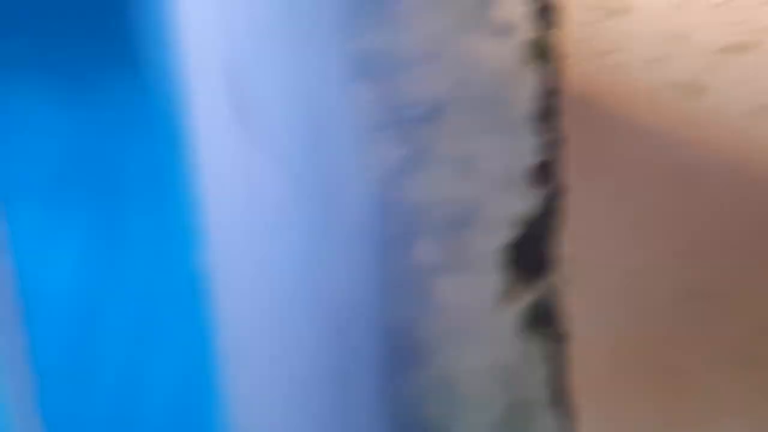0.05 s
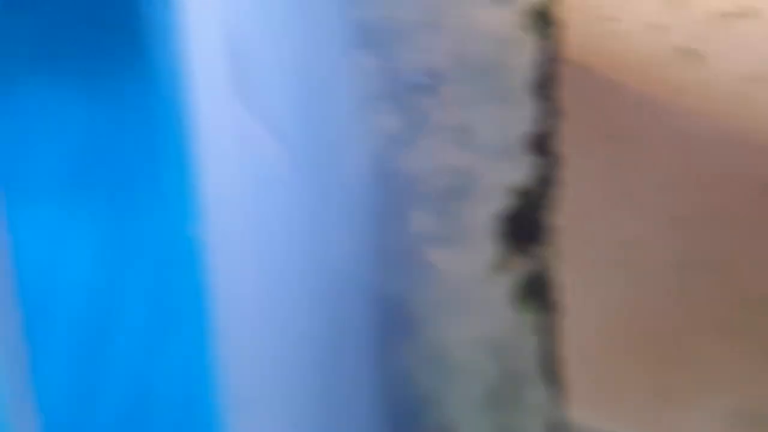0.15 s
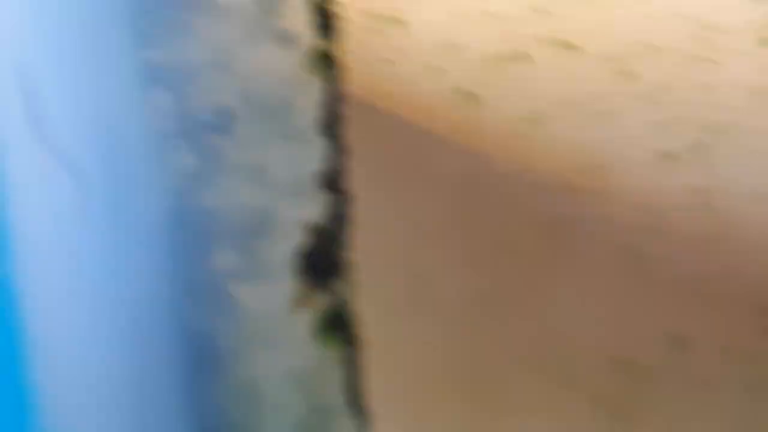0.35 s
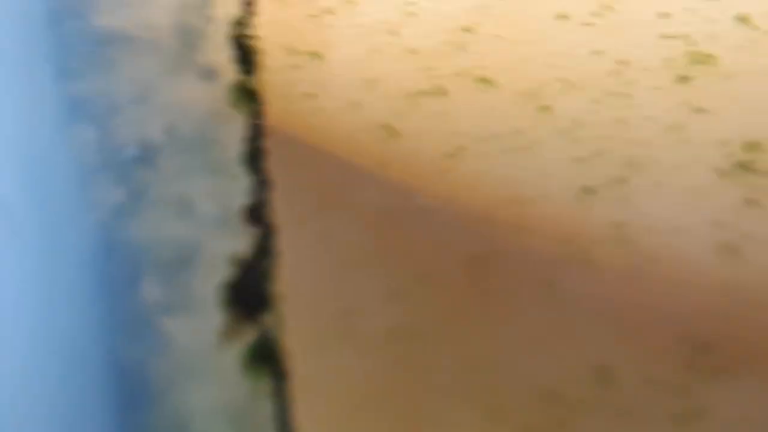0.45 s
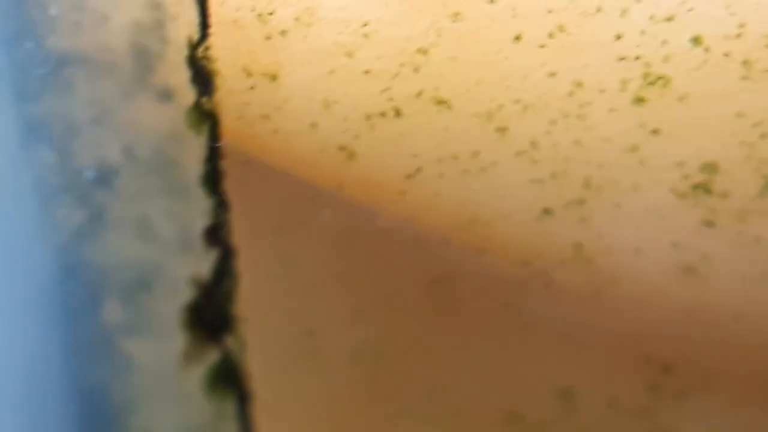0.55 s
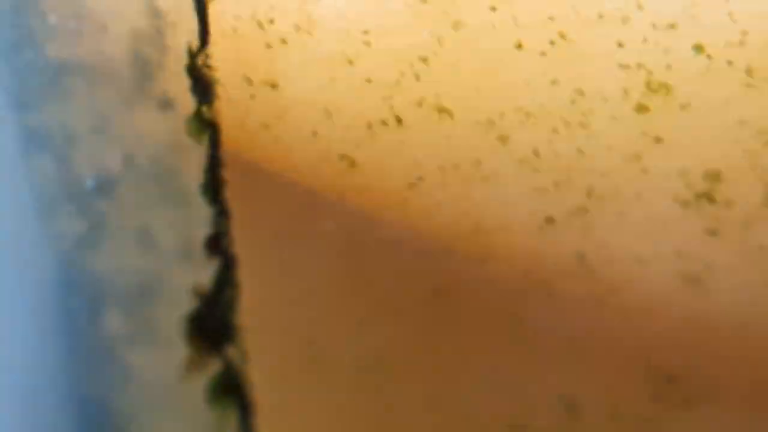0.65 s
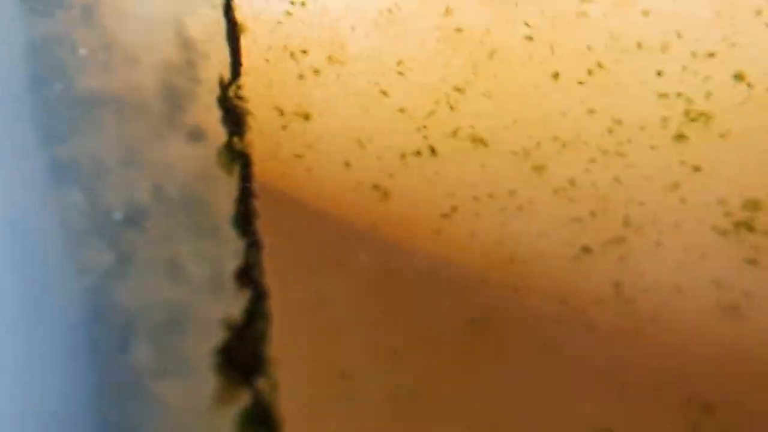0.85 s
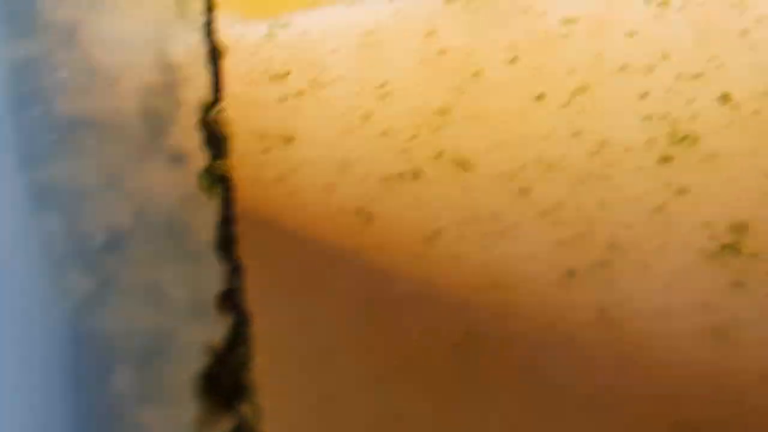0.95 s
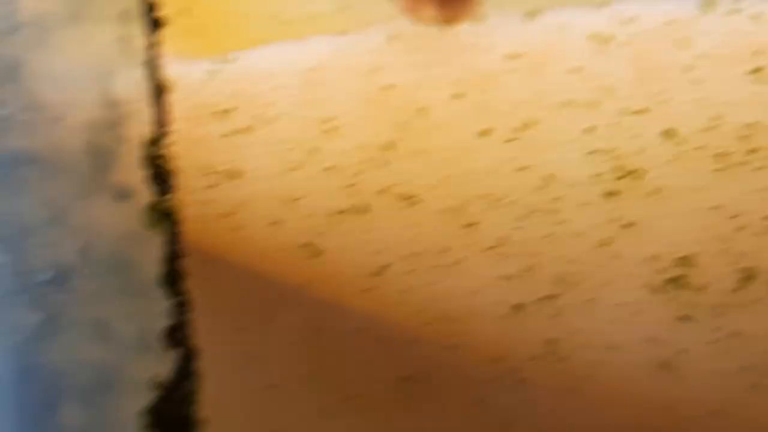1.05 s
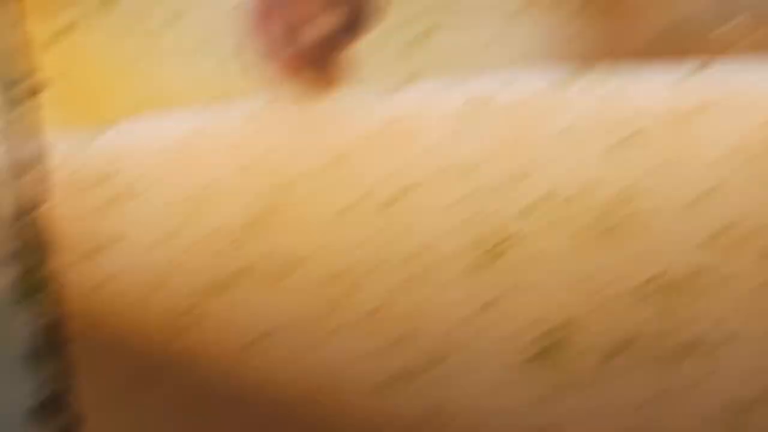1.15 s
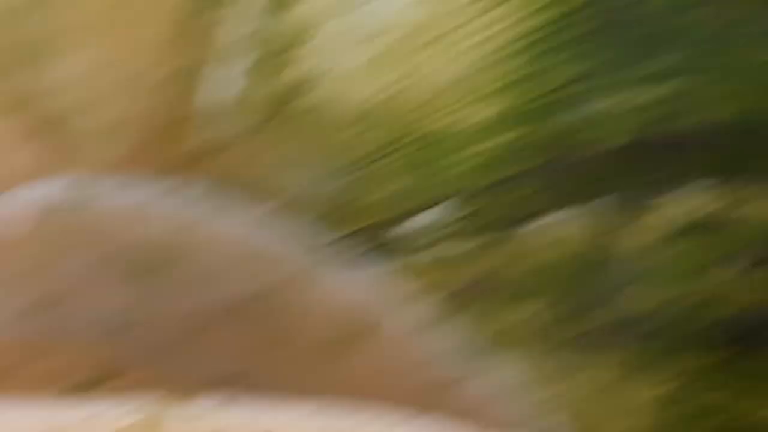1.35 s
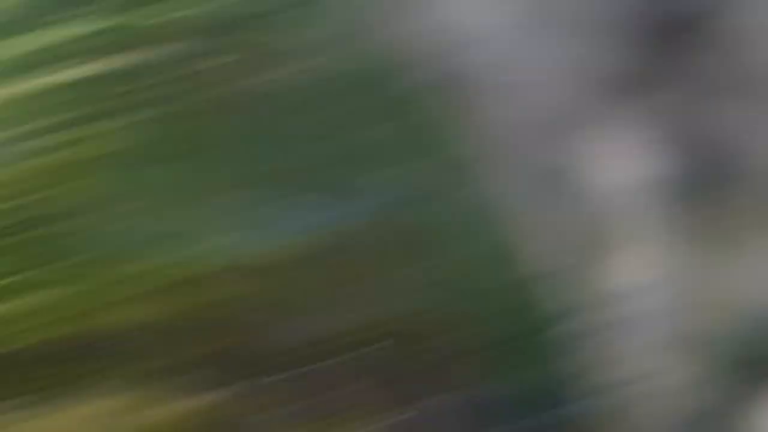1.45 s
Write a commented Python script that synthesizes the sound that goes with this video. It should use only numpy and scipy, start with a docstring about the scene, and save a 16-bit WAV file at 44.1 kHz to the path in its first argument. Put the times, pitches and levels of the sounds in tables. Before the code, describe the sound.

A single sharp knock on a hard, hollow object comes close by at about 0.2 seconds, with a bright clink and a short low body. A small clack follows near 0.4 seconds. Faint thin handling ticks are scattered throughout, with soft finger bumps around 0.9 and 1.4 seconds. Quiet room hiss, low hum and very faint, distant high chirps lie underneath until the end at 1.5 seconds.

```python
"""A knock on a hollow object

One close impact excites the modes of a hard object: a bright clink, then a hollow body whose low
notes arrive last. Handling leaves a small clack, a few soft bumps and thin ticks. Behind it the
room hums, rumbles and hisses, and faint high chirps echo in it. Ringing is a sum of damped
sinusoids, scuffs and ticks are damped noise, and reverberation is a convolution."""
import sys
import numpy as np
from scipy import signal
from scipy.fft import rfft, irfft, next_fast_len
from scipy.io import wavfile
from scipy.ndimage import map_coordinates

SR = 44100
rng = np.random.default_rng(int(sys.argv[2]) if len(sys.argv) > 2 else 0)


def output_pcm(signal):
    """Save a mono or channel-first signal as 16-bit PCM at the path in sys.argv[1].

    Samples are clipped to [-1, 1] before scaling.
    """
    pcm = np.clip(np.atleast_2d(signal).T, -1, 1) * 32767
    wavfile.write(sys.argv[1], SR, np.round(pcm).astype(np.int16))


N = 66150

# Levels in the tables are relative: the functions apply further gains.
# Modes of the hollow body and of the bright clink: pitch_hz, level_db, t60_s, arrival_s, swell_s
BODY_MODES = [(134, -33.5, 0.082, 0.0114, 0.0082), (262.5, -29, 0.081, .008, 0.0052),
              (336, -27.5, 0.048, .007, 0.015), (455.4, -36, 0.08, .0075, 0.0013),
              (588, -40.5, 0.087, 0.0017, 0.0013), (781, -23.5, 0.05, 0.0006, 0.0052),
              (1208, -31, 0.023, 0.0034, 0.0007), (1276, -30, 0.0037, 0.001, 0.00067),
              (1590, -33.5, 0.013, 0.00054, 0.0024), (2600, -30.5, 0.0038, 0.0054, 0.00054)]
CLINK_MODES = [(4034, -38, .08, .0002, .003), (7650, -37, .045, .002, .003),
               (9138, -41, .052, .0015, .0015), (9450, -42, .016, 0, .0005)]
# Spectra of the contact crack and of the thud after it: frequency_hz, level_db
CRACK_SPECTRUM = [(500, 5.5), (1500, -2), (2500, -0.5), (3200, -13.5), (4400, 3.5), (6500, -9), (9400, -10),
                  (10800, -16), (13000, -19), (16000, -29)]
THUD_SPECTRUM = [(30, -40), (60, -40), (130, -3), (185, -4), (280, -14), (450, 0), (650, -24.5),
                 (1000, -23), (1300, -17), (2000, -33), (5000, -30), (9000, -120)]
# Soft contact as the object settles after the knock: delay_s, gain_db
SETTLING = [(.071, -29)]
# Colour of the knock's reverberation: frequency_hz, gain_db
KNOCK_ECHO_GAIN = [(120, -1.5), (300, -20), (780, -25), (1300, -20), (4000, -19), (9000, -11.5)]
# Small hard clack: start_s, level_db
CLACKS = [(0.3801, -38.5)]
# Modes of the clack: pitch_hz, level_db, t60_s
CLACK_MODES = [(790, -9.5, 0.015), (1300, -3, 0.015), (2120, 3.5, 0.01), (2380, -32, 0.0049),
               (3930, -17, 0.015), (7200, -14.5, 0.015), (9180, -6.5, 0.014)]
# Soft bumps of the fingers: start_s, push_db, scuff_db, centre_hz, t60_s
FINGER_BUMPS = [(.9083, -51, -57.5, 830, 0.036), (1.002, -56.5, -69, 650, 0.024),
                (1.4238, -39.5, -49.5, 497, 0.02), (1.447, -45, -49.5, 694, 0.011)]
# Thin ticks: start_s, level_db, centre_hz, width_octaves, t60_s, echo_db
TICKS = [(0.0153, -49.5, 9160, 0.35, .015, 3.5), (0.0532, -42.5, 9220, 0.088, 0.016, -1),
         (0.065, -46, 6500, 0.96, 0.017, 2.5), (0.1915, -47, 9380, 0.12, 0.03, -8),
         (0.2613, -49, 9040, 0.45, 0.018, 1.5), (0.27, -61.5, 7750, 0.36, 0.024, -8),
         (0.3395, -42, 8600, 0.34, 0.011, -10), (0.3851, -48, 8960, 0.1, 0.037, -8.5),
         (0.5043, -46, 9050, 0.37, 0.033, -3.5), (0.5668, -38.5, 8900, 0.6, 0.0093, -16),
         (0.5924, -47, 8300, 0.56, 0.029, -4), (0.63, -56.5, 9300, 0.24, 0.015, -3),
         (0.7085, -41.5, 10200, 0.33, 0.034, -4.5), (0.712, -61, 5060, 0.34, 0.078, 2),
         (0.8045, -47, 8100, 0.62, 0.0084, -1), (0.9007, -47.5, 8100, 0.52, 0.01, -1.5),
         (1.1287, -53, 8900, 0.52, 0.015, -11), (1.136, -59.5, 5240, 0.13, 0.048, 1),
         (1.292, -50.5, 5100, 0.12, 0.038, 1), (1.3191, -47.5, 9000, 0.07, 0.021, 1),
         (1.3385, -47, 10700, 0.37, 0.015, 1.5), (1.391, -55, 7000, 1, 0.038, 4),
         (1.44, -55, 7850, 1, 0.065, -5), (1.473, -51.5, 9200, 0.66, 0.02, 0)]
# Far chirps: start_s, level_db, pitch_hz, length_s
CHIRPS = [(.002, -61.5, 3130, .04), (0.081, -58, 3080, 0.023), (0.138, -65, 3170, 0.031),
          (0.447, -65, 1147, 0.021), (0.47, -69, 2350, 0.047), (0.501, -70, 2155, 0.012),
          (0.51, -60, 3260, 0.053), (0.588, -60, 3284, 0.032), (0.596, -63.5, 2500, 0.032),
          (0.704, -64, 3483, 0.041), (0.735, -67.5, 3440, 0.017), (0.776, -73, 2440, 0.042),
          (0.823, -61.5, 3245, 0.032), (0.841, -55, 3700, 0.0079), (0.886, -67, 3380, 0.028),
          (0.912, -63.5, 3310, 0.017), (0.942, -59.5, 3495, .035), (1.021, -62.5, 3216, 0.01),
          (1.056, -62, 3270, 0.027), (1.132, -61, 3250, 0.049), (1.15, -73.5, 2470, .05),
          (1.321, -62, 3235, .02), (1.348, -51, 3390, 0.013), (1.371, -54, 3315, 0.026),
          (1.437, -55.5, 3500, 0.012), (1.482, -60.5, 3230, 0.055)]
# Harmonics of the mains hum: pitch_hz, level_db
HUM_HARMONICS = [(100, -61), (200, -80.5)]
# Spectra of the rumble, the hiss and the hiss between the channels: frequency_hz, level_db
RUMBLE_SPECTRUM = [(25, -29), (50, -6), (85, 0.5), (135, 0.5), (220, -4), (320, -9.5), (500, -31.5),
                   (1000, -27.5)]
HISS_SPECTRUM = [(200, 3.5), (500, 6.5), (1000, 0), (2000, -2.5), (2700, -5), (3400, 4), (4300, 0),
                 (5200, 6.5), (6400, -6.5), (9200, 3.5), (11500, -14.5), (16000, -14)]
SIDE_SPECTRUM = [(100, -1), (1000, 0.5), (5000, -9.5), (12000, 4.5), (16000, 3.5)]
# Slow envelopes of the rumble and the hiss: time_s, level_db
RUMBLE_ENVELOPE = [(0, -66), (.5, -66), (.85, -67), (1.0, -66), (1.1, -65), (1.3, -64), (1.5, -64.5)]
HISS_ENVELOPE = [(0, -68.5), (.09, -69), (.17, -71), (.29, -67.5), (.36, -80), (.46, -67), (.54, -69.5),
                 (.68, -68.5), (.85, -73), (1.07, -73.5), (1.16, -73), (1.26, -74.5), (1.36, -68),
                 (1.5, -64.5)]
# Reverberation time of the room: frequency_hz, t60_s
ROOM_T60 = [(120, 0.15), (500, 0.64), (1500, 0.39), (3500, .36), (9000, 0.33), (15000, 0.08)]

KNOCK_S, KNOCK_DB = 0.2231, 1.5
SETTLE_TOP_HZ, PUSH_TOP_HZ, TICK_TOP_HZ = 1000, 1760, 12100
CLACK_SWELL_S, ROOM_BUILD_S = 0.00078, 0.0027
CHIRP_WANDER, HISS_SWAY_DB = 0.04, 3.73
LOW_CUT_HZ, TOP_HZ = 28, 16100


def knock():
    """Impact excitation: contact cracks and sets the modes ringing; settling excites the body again."""
    t = since(KNOCK_S)
    crack = amp(-38) * noise(CRACK_SPECTRUM) * envelope(t, t60_s=0.038, attack_s=0.00025)
    clink = amp(-0.5) * ring(KNOCK_S, CLINK_MODES)
    blow = crack + clink + ring(KNOCK_S, BODY_MODES)
    for delay_s, gain_db in SETTLING:
        touch = ring(KNOCK_S + delay_s, BODY_MODES)
        blow += amp(gain_db) * filtered(touch, lambda hz: 1 / (1 + (hz / SETTLE_TOP_HZ) ** 2))
    direct = blow + thud()
    echo = filtered(room(blow), lambda hz: amp(along(KNOCK_ECHO_GAIN, hz)))
    return amp(KNOCK_DB) * (direct + echo)


def ring(contact_s, modes):
    """Modal superposition: each mode arrives, swells and dies away as a damped sinusoid."""
    out = np.zeros(N)
    for pitch_hz, level_db, t60_s, arrival_s, swell_s in modes:
        t = since(contact_s + arrival_s)
        swell = np.sin(np.pi / 2 * np.minimum(t / swell_s, 1)) ** 2
        out += amp(level_db) * swell * decay(t, t60_s) * np.sin(2 * np.pi * pitch_hz * t)
    return out


def thud():
    """Exponential decay of a dense spectrum: a low rumble that follows just after the knock."""
    t = since(KNOCK_S + 0.0096)
    return amp(-40) * noise(THUD_SPECTRUM) * envelope(t, t60_s=0.16, attack_s=0.01)


def handling():
    """Hard and soft contact: the clack rings in modes, while fingers give dull pulses and a scuff."""
    modes = [(hz, db, t60_s, 0, CLACK_SWELL_S) for hz, db, t60_s in CLACK_MODES]
    clack = sum(amp(level_db) * ring(start_s, modes) for start_s, level_db in CLACKS)
    bumps = np.zeros(N)
    for start_s, push_db, scuff_db, centre_hz, t60_s in FINGER_BUMPS:
        slow_push = push(start_s, centre_hz=230)
        bumps += amp(push_db) * (push(start_s, centre_hz) + slow_push)
        scuff = band(centre_hz, octaves=0.52) * envelope(since(start_s), t60_s, attack_s=0.00045)
        bumps += amp(scuff_db) * scuff
    echo = room(amp(-18) * clack + amp(-13.5) * bumps)
    return clack + bumps + echo


def push(peak_s, centre_hz):
    """An aperiodic pulse: one pressure swing with no ring, briefer as its frequency rises."""
    phase = np.abs(2 * np.pi * centre_hz * (since(0) - peak_s))
    pulse = (1 - phase) * np.exp(-phase)
    return filtered(pulse, lambda hz: 1 / (1 + (hz / PUSH_TOP_HZ) ** 4))


def ticks():
    """Damped resonance: bright bursts of noise, some nearly dry and some trailing off in the room."""
    out = np.zeros(N)
    for start_s, level_db, centre_hz, octaves, t60_s, echo_db in TICKS:
        shape = envelope(since(start_s), t60_s, attack_s=0.0011)
        tick = amp(level_db) * band(centre_hz, octaves) * shape
        out += tick + amp(echo_db) * room(tick)
    return filtered(out, lambda hz: 1 / np.sqrt(1 + (hz / TICK_TOP_HZ) ** 8))


def chirps():
    """Random frequency modulation: short, unsteady, raspy whistles, smeared by the room."""
    out = np.zeros(N)
    for start_s, level_db, pitch_hz, length_s in CHIRPS:
        wandering_hz = pitch_hz * (1 + CHIRP_WANDER * wobble(knots_per_s=600))
        whistle = np.sin(2 * np.pi * np.cumsum(wandering_hz) / SR)
        rasp = amp(-6) * band(pitch_hz, octaves=0.13)
        progress = np.minimum(since(start_s) / length_s, 1)
        swell = np.sqrt(np.abs(np.sin(np.pi * progress)))
        out += amp(level_db) * swell * (whistle + rasp)
    return amp(-1.5) * out + amp(-4.5) * room(out)


def room(x):
    """Diffuse reverberation: convolution with a unit-energy noise tail, each band at its own decay."""
    hz, t, spectra = signal.stft(rng.standard_normal(SR // 2), SR, nperseg=256)
    shape = envelope(t, along(ROOM_T60, hz)[:, None], ROOM_BUILD_S)
    tail = signal.istft(spectra * shape, SR, nperseg=256)[1]
    return signal.fftconvolve(x, tail / np.linalg.norm(tail))[:N]


def background():
    """Line and continuous spectra: mains hum over low room rumble and a hiss that swells and sinks."""
    t = since(0)
    hum = sum(amp(db) * unit(np.sin(2 * np.pi * (hz * t + rng.random()))) for hz, db in HUM_HARMONICS)
    hiss_db = curve(HISS_ENVELOPE) + HISS_SWAY_DB * wobble(knots_per_s=18.7)
    hiss = amp(hiss_db) * noise(HISS_SPECTRUM)
    rumble = amp(curve(RUMBLE_ENVELOPE)) * noise(RUMBLE_SPECTRUM)
    return hum + rumble + hiss


def noise(spectrum):
    """Spectral shaping: white noise coloured by (frequency_hz, level_db) points, at rms 1."""
    return unit(filtered(rng.standard_normal(N), lambda hz: amp(along(spectrum, hz))))


def band(centre_hz, octaves):
    """Band-pass filtering: noise of rms 1 around one resonance."""
    bell = lambda hz: (1 + (np.log2((hz + 1) / centre_hz) / octaves) ** 2 / 2) ** -2
    return unit(filtered(rng.standard_normal(N), bell))


def filtered(x, response):
    """Linear filtering: the spectrum of x times a frequency response."""
    size = next_fast_len(N + SR // 2)
    hz = np.fft.rfftfreq(size, 1 / SR)
    return irfft(rfft(x, size) * response(hz), size)[..., :N]


def envelope(t, t60_s, attack_s):
    """A transient: exponential build-up times exponential decay."""
    return decay(t, t60_s) * (1 - np.exp(-t / attack_s))


def decay(t, t60_s):
    """Exponential damping: a fall of 60 dB every t60_s."""
    return amp(-60 * t / t60_s)


def wobble(knots_per_s):
    """Spline interpolation: a smooth curve through random knots."""
    return map_coordinates(rng.standard_normal(N // 16), [np.arange(N) * knots_per_s / SR], mode="wrap")


def curve(points):
    """Linear interpolation of (time_s, value) points at every sample."""
    return np.interp(since(0), *np.transpose(points))


def along(points, hz):
    """Interpolation of (frequency_hz, value) points on a logarithmic frequency axis."""
    knots_hz, values = np.transpose(points)
    return np.interp(np.log(hz + 1), np.log(knots_hz + 1), values)


def since(start_s):
    """Elapsed seconds, zero before the start."""
    return np.maximum(np.arange(N) / SR - start_s, 0)


def amp(db):
    """Decibels as an amplitude ratio."""
    return 10 ** (np.asarray(db) / 20)


def unit(x):
    """Normalisation to rms 1."""
    return x / np.sqrt(np.mean(x ** 2) + 1e-20)


def scene():
    """Mid-side stereo: the sources add in the centre, with a trace of hiss in opposite phase."""
    mid = knock() + handling() + ticks() + chirps() + background()
    side = amp(-88) * noise(SIDE_SPECTRUM)
    return np.array([mid + side, mid - side])


def record(dry):
    """Band limiting: a second-order high-pass thins the deepest bass; nothing passes above TOP_HZ."""
    return filtered(dry, lambda hz: (1j * hz / (LOW_CUT_HZ + 1j * hz)) ** 2 * (hz < TOP_HZ))


dry = scene()
out = record(dry)
output_pcm(out)
```